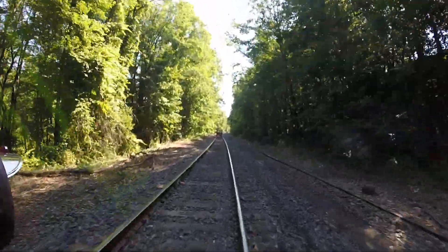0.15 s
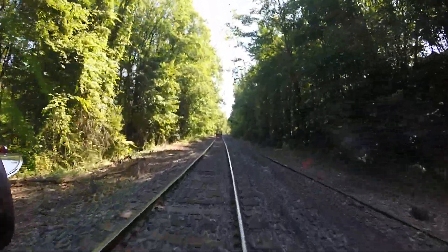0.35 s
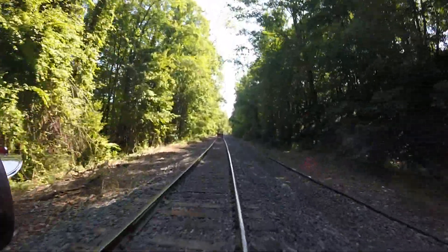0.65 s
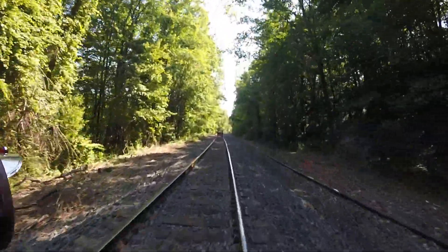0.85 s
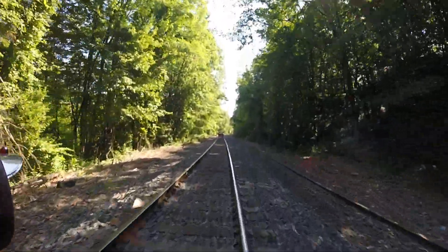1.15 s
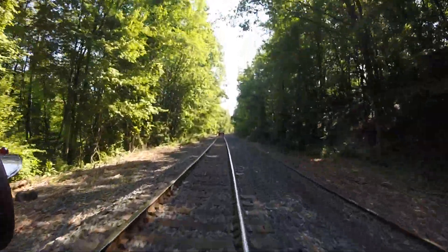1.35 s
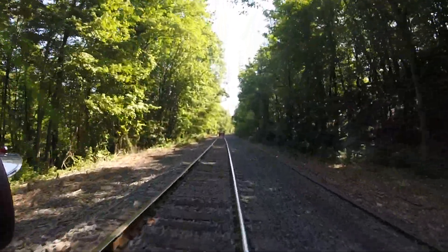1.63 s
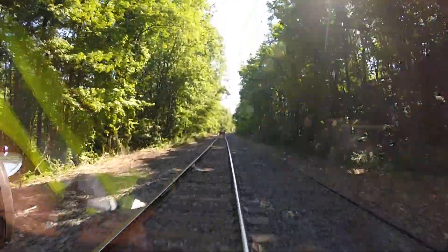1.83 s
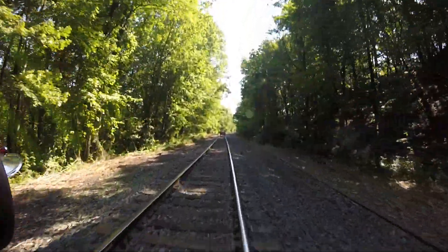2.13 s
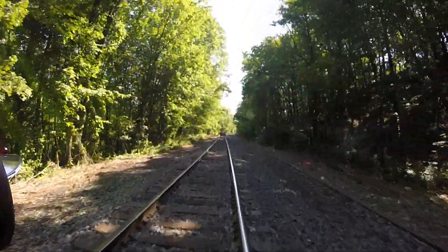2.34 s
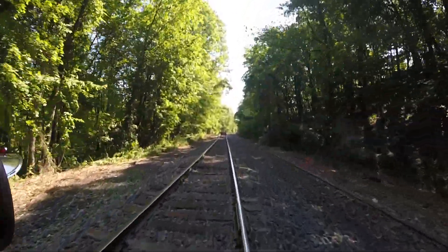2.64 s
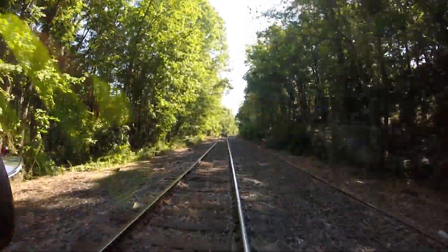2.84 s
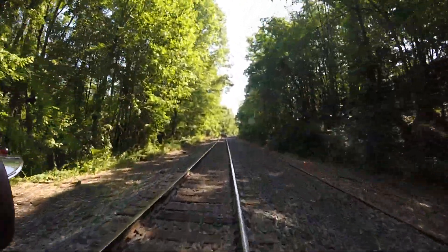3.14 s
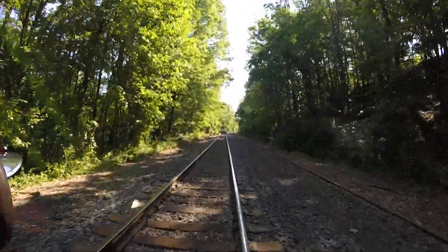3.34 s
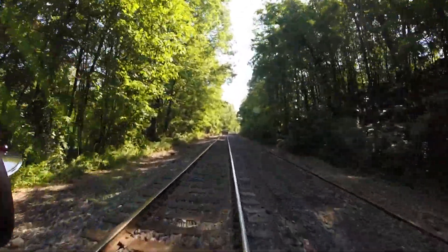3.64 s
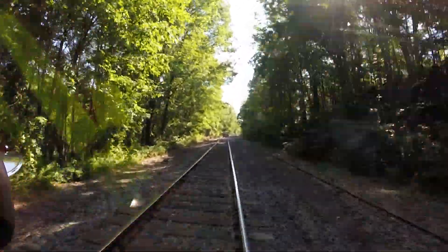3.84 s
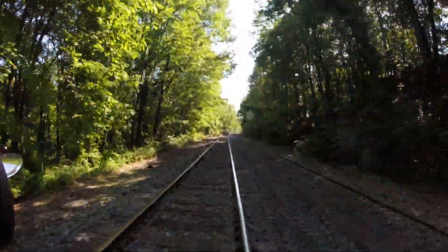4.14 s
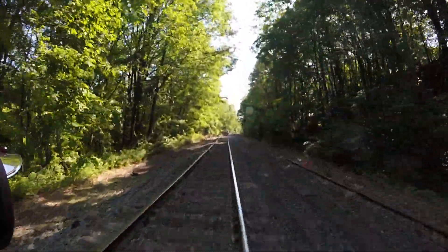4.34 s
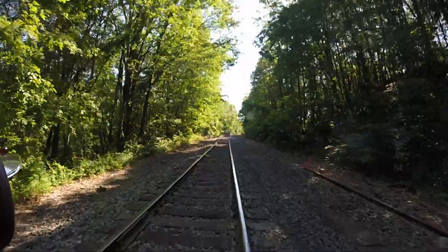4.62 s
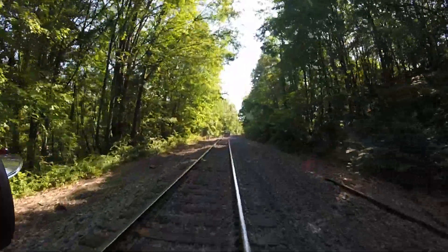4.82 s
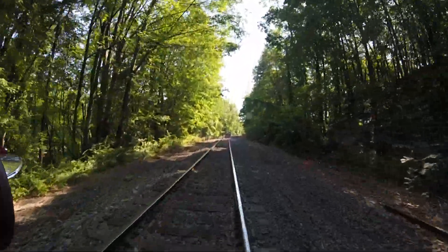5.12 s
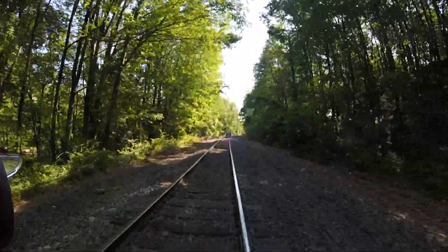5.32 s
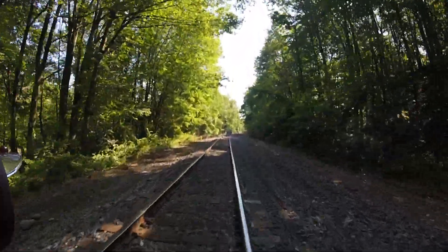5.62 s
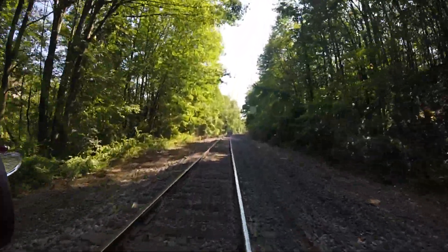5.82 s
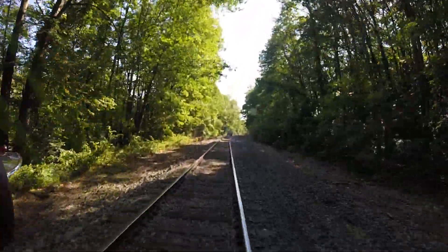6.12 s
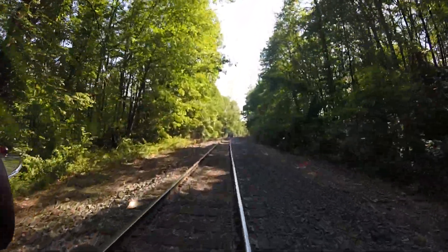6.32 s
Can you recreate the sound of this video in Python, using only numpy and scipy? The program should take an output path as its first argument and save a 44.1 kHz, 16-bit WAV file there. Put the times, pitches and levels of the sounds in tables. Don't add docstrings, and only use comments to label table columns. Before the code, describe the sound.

Riding a small motorised rail car: fast, even engine chugging, low wheel rumble, rattling frame and irregular knocks over rail joints, heard closely and muffled.

```python
import sys
import numpy as np
from scipy import signal
from scipy.io import wavfile
from scipy.ndimage import uniform_filter1d, minimum_filter1d

SR = 44100
rng = np.random.default_rng(int(sys.argv[2]) if len(sys.argv) > 2 else 0)


def waveform_to_disk(signal):
    frames = np.transpose(np.atleast_2d(signal))
    scaled = np.clip(frames, -1, 1) * 32767
    samples = np.round(scaled).astype(np.int16)
    wavfile.write(sys.argv[1], SR, samples)


def voltage_ratio(level):
    return 10 ** (np.asarray(level, float) / 20)


N = 285322


def amp_of(points, hz, column=1):
    table = np.array(points, float)
    return np.interp(np.log(hz), np.log(table[:, 0]), table[:, column])


def drift(rate):
    r = np.exp(-40 * np.pi * rate / SR)
    noise = rng.standard_normal(N // 20 + 2002)
    slow = signal.lfilter([1], [1, -2 * r, r * r], noise)[2000:]
    slow = slow - uniform_filter1d(slow, size=300)
    return np.interp(np.arange(N) / 20, np.arange(len(slow)), slow / slow.std())


def resonance(x, hz, width_hz):
    r = np.exp(-np.pi * width_hz / SR)
    top = np.array([1, 0, -1]) * (1 - r * r) / 2
    return signal.lfilter(top, [1, -2 * r * np.cos(2 * np.pi * hz / SR), r * r], x)


def cycles():
    at_start, firings_per_s, gain_per_s2 = .79125, 15.9797, .149484
    t = np.arange(N) / SR
    return at_start + firings_per_s * t + gain_per_s2 * t ** 2 / 2


def strokes(start, rise, fall, uneven):
    turn = cycles() - start + 1
    sizes = 1 + uneven * rng.standard_normal(int(turn[-1]) + 1)
    since = turn % 1
    return sizes[turn.astype(int)] * (1 - np.exp(-(since / rise) ** 2)) * np.exp(-since / fall)


def bursts(rows):
    rise_s = .0025
    u = np.arange(SR // 4) / SR
    out = np.zeros(N + SR)
    for s, db, length in rows:
        start = int(s * SR)
        out[start:start + len(u)] += voltage_ratio(db) * (1 - np.exp(-u / rise_s)) * np.exp(-(u / length) ** 2)
    return out[:N]


# (time [s], thud level [dB],
# rattle level [dB], length [s])
JOLTS = [(0.272, -12, -42, 0.01), (1.074, -14.5, -32, 0.062), (1.18, -12.5, -32, 0.027),
         (1.836, -17, -37, 0.09), (1.922, -24.5, -38, 0.03), (2.239, -10, -38, 0.0093),
         (3.077, -13.5, -36.5, 0.038), (3.168, -10.5, -33, 0.024), (3.472, -23, -34, 0.03),
         (3.701, -11.5, -30, 0.046), (3.805, -12, -28, 0.013), (3.969, -11.5, -45, 0.016),
         (4.347, -13, -30, 0.053), (4.439, -15.5, -32, 0.034), (4.462, -11, -31, 0.035),
         (5.137, -12.5, -30.5, 0.017), (5.306, -17.5, -37, 0.12), (5.627, -12, -34, 0.014),
         (5.645, -14.5, -34, 0.041), (5.743, -6.5, -28.5, 0.027), (6.07, -12.5, -28.5, 0.019),
         (6.078, -21, -38.5, 0.041), (6.269, -17, -35.5, 0.038), (6.373, -20, -33, 0.017),
         (0.026, -23, -37, .012), (0.637, -26, -32, .01), (1.81, -26, -35, .01), (2.004, -27, -34, .012),
         (2.06, -27, -35, 0.011), (2.363, -26.5, -34, 0.012), (2.612, -25, -37, 0.013),
         (2.974, -30, -35, .01), (3.382, -24, -32, 0.016), (3.583, -25, -38, 0.011),
         (3.815, -21, -35.5, 0.012), (4.247, -20.5, -37, .012), (4.313, -31, -35, 0.011),
         (4.554, -28, -41, 0.0082), (4.786, -24, -30.5, 0.012), (4.995, -15, -34, 0.026),
         (5.508, -25, -38, .01), (5.67, -19.5, -42, .01), (5.863, -26, -38, .01), (5.973, -27, -30, 0.013)]
# (time [s], level [dB], length [s])
JINGLES = [(1.0765, -44, .075), (1.836, -60, .067), (3.17, -37, 0.033), (3.702, -39, .063),
           (3.81, -51.5, .02), (4.361, -36, .025), (4.4455, -34, 0.029), (4.466, -33, 0.04),
           (5.312, -52.5, .064), (5.746, -44, 0.017), (5.885, -44, .074), (6.08, -35, 0.033)]


def jolts():
    rows = np.array(JOLTS)
    thud = voltage_ratio(11.0) * bursts(rows[:, [0, 1, 3]])
    rattle = voltage_ratio(32.0) * bursts(rows[:, [0, 2, 3]])
    jingle = voltage_ratio(42.0) * bursts(JINGLES)
    return thud, rattle, jingle


# (time [s], level [dB])
ROUGHNESS = [(0.0, -18.5), (0.41, -19.5), (0.77, -19), (1.17, -20), (1.49, -19.5), (1.84, -19), (2.83, -20),
             (3.12, -19.5), (3.549, -19), (4.38, -20), (4.74, -20.5), (5.46, -20.5), (5.62, -21),
             (5.8, -20.5), (6.2, -20), (6.47, -18.5)]
# (frequency [Hz], share [dB per dB])
FOLLOWS = [(250, 0.21), (600, 2.1), (2500, 0.76), (9000, 0.71)]
# (frequency [Hz], at the firing [dB], at the idle turn [dB])
SHAKE = [(40, -2, -3.5), (110, 5.5, 0.5), (250, 0, 5.5), (500, -2.5, 0), (755, 4.5, 2), (1190, 5.5, 1),
         (2000, 6.5, 5.5), (4560, 12.5, 2.5), (7500, 19.5, 9), (12000, 23.5, 12)]
# (frequency [Hz], lag [ms])
SHAKE_LAG = [(700, -4.5), (1500, -3.5), (3000, -1.5), (6000, 0), (10000, 1.5)]
# (frequency [Hz], level [dB per Hz])
COLOUR = [(22, -67.5), (45, -58.5), (65, -66.5), (110, -54.5), (160, -55), (200, -55.5), (280, -53.5),
          (380, -51), (520, -50.5), (700, -58.5), (1100, -72), (2100, -84.5), (2900, -92), (5000, -93.5),
          (6200, -104), (12500, -122)]


def rolling():
    shared_db, own_db, lumps_db, grain_db = 1.07, 0.5, 4, 1.0
    run_in = 8000
    s, db = np.transpose(ROUGHNESS)
    rough_db = np.interp(np.arange(N) / SR, s, db - np.mean(db))
    firing = strokes(0.068, 0.036, 0.13, uneven=0.072)
    idle = strokes(0.5, 0.058, 0.36, uneven=0.17)
    together = drift(10)
    knocks = jolts()
    white = rng.standard_normal((2, run_in + N))
    white[:, run_in:] *= voltage_ratio(grain_db * drift(140))
    edges = 20 * 2 ** np.arange(0, 9.7, 1 / 3)
    out = np.zeros(N)
    for k, (low, high) in enumerate(zip(edges, edges[1:])):
        hz = np.sqrt(low * high)
        band_pass = signal.butter(3, [low, high], "band", fs=SR, output="sos")
        band = signal.sosfilt(band_pass, white[k % 2])[run_in:]
        track_db = amp_of(FOLLOWS, hz) * rough_db * (hz > 150)
        lag = int(amp_of(SHAKE_LAG, hz) * SR / 1000)
        firing_db = amp_of(SHAKE, hz) * np.roll(firing, lag)
        idle_db = amp_of(SHAKE, hz, column=2) * idle
        flicker_db = shared_db * together + (own_db + lumps_db * (hz < 110)) * drift(0.5)
        steady = voltage_ratio(track_db + firing_db + idle_db + flicker_db - 8.5)
        knock = knocks[int(hz > 1000) + int(hz > 6300)] * (hz > 150)
        out += voltage_ratio(amp_of(COLOUR, hz) + 51.5) * band * np.hypot(steady, knock)
    return out


# (frequency [Hz], width [Hz], level [dB])
PANELS = [(516, 97, 3), (464, 67, 3), (285.8, 25, 5), (186, 31, 5), (362.4, 11, 4.5), (713, 26, 5),
          (853.2, 32, 9.5), (1207, 48, 2.5), (1632, 200, 5.5), (2100, 120, 5), (2300, 47, 4),
          (2780, 170, 5), (7400, 220, 2), (8880, 230, 5.5)]
# (frequency [Hz], width [Hz], level [dB])
GAP = [
    (3230, 300, -8),
    (3470, 100, 5.5),
]


def through_housing(x):
    for hz, width_hz, db in [*PANELS, *GAP]:
        x = x + (voltage_ratio(db) - 1) * resonance(x, hz, width_hz)
    return signal.sosfilt(signal.butter(8, 12800, fs=SR, output="sos"), x)


def damped_tones(rows, rise_cycles):
    u = np.arange(SR // 2) / SR
    out = np.zeros(N + SR)
    for s, db, hz, t60 in rows:
        start = int(s * SR)
        fade = voltage_ratio(db - 60 * u / t60) * (1 - np.exp(-u * hz / rise_cycles))
        out[start:start + len(u)] += np.sin(2 * np.pi * hz * u) * fade
    return out[:N]


# (time [s], peak level [dB], frequency [Hz], t60 [s])
HUMS = [(0.118, -12.5, 354, 0.25), (0.87, -25, 415, 0.15), (0.968, -26, 425, 0.17),
        (1.217, -13, 275.6, 0.19), (1.425, -11.5, 361, 0.15), (1.558, -13, 347, 0.11),
        (1.645, -9, 415, 0.14), (1.729, -9, 367, 0.18), (2.199, -9, 393, 0.15), (2.41, -12, 371, 0.16),
        (2.514, -14, 280, 0.17), (2.84, -18, 400, 0.13), (2.959, -10.5, 397, 0.13), (3.598, -17, 365, 0.1),
        (3.78, -24, 401, 0.13), (4.219, -11, 383, 0.18), (4.828, -17.5, 321, 0.092),
        (5.757, -5.5, 295, 0.11), (5.821, -10.5, 399, 0.1), (5.903, -10, 351, 0.077),
        (5.942, -14, 370, 0.2), (6.018, -12, 310, 0.18), (6.118, -17, 301, 0.13), (6.169, -12.5, 271, 0.18),
        (6.436, -4.5, 305, 0.15), (6.405, -10, 320, 0.11), (6.339, -16, 270, 0.11), (.05, -10.5, 200, 0.14),
        (.14, -11.5, 194, .15), (4.68, -12.5, 395, 0.16), (5.5, -13, 260, .14), (3.27, -13.5, 330, 0.15),
        (0.635, -12, 277.5, .14), (2.375, -17.5, 382, .12), (3.065, -12, 375, 0.21),
        (3.21, -11.5, 371, 0.14), (4.059, -10, 271.4, 0.14), (4.115, -13.5, 278, .12),
        (5.07, -17, 265, 0.11), (5.285, -18.5, 385, 0.15), (5.83, -11.5, 294, 0.16),
        (5.883, -7.5, 266, .14), (6.035, -6, 350, .1), (6.3, -8, 289, 0.14), (6.36, -14, 348, .12)]


def floor_hums():
    return damped_tones(HUMS, rise_cycles=4.0)


# (time [s], peak level [dB], frequency [Hz], t60 [s])
BOOMS = [(0.186, -5, 508, 0.074), (0.426, -13.5, 466, 0.16), (0.841, -9, 464, 0.24), (0.87, -1, 472, 0.087),
         (1.049, -6.5, 478, 0.16), (1.29, -10.5, 553, 0.1), (1.73, -9, 460, 0.076), (1.978, -4, 505, 0.24),
         (2.829, -5, 479, 0.1), (3.442, -10.5, 437, 0.13), (3.821, -7, 500, 0.077),
         (3.975, -12, 460, 0.076), (4.429, -3.5, 512, 0.11), (4.469, -11, 541, 0.09),
         (5.242, -5.5, 470, 0.078), (5.42, -16, 478, 0.078), (5.899, -2, 510, 0.075),
         (6.074, -10, 462, 0.12), (6.119, -17, 414, 0.074), (6.382, -1, 437, 0.091), (0.151, -7, 495, 0.14),
         (0.277, -13.5, 500, .1), (1.7, -13, 490, .1), (1.818, -15, 478, 0.092), (5.095, -6, 520, 0.13),
         (5.4, -10, 480, .1), (6.06, -14.5, 500, 0.091)]


def housing_booms():
    return damped_tones(BOOMS, rise_cycles=4.0)


# (time [s], frequency [Hz], peak level [dB], t60 [s])
RINGS = [(1.041, 186, -24, 0.15), (0.93, 3430, -47, .06), (1.93, 193, -14, 0.56), (3.172, 253.5, -13, 0.23),
         (3.81, 291, -6, 0.2), (3.991, 192, -6, 0.11), (1.85, 218, -12.5, 0.18), (3.382, 227, -12.5, 0.17),
         (4.33, 49, -22, 0.53), (4.801, 170, -14, 0.21), (5.4, 265.6, -19, 0.42), (5.87, 370, -15, 0.34),
         (4.363, 9050, -48, 0.022), (4.445, 7600, -53, 0.035), (4.471, 230, -21, 0.13),
         (4.485, 9000, -43, .02), (5.752, 425, -23, 0.091), (5.755, 790, -25, .08), (3.707, 2500, -37, .04),
         (1.09, 2030, -35, .1), (3.81, 1980, -31, 0.043), (3.652, 3620, -46, 0.036),
         (4.25, 4460, -43, 0.045), (5.747, 830, -10, 0.072), (5.748, 1300, -24, 0.056),
         (5.75, 580, -16, .06), (5.6, 1380, -35, .05), (6.08, 838, -17, 0.11), (6.272, 236, -9.5, 0.16),
         (6.381, 280, -18.5, 0.62), (4.2, 1620, -33, 0.11), (4.95, 1620, -36, .12), (4.5, 1750, -34, 0.055),
         (5.1, 1400, -31, .07), (4.765, 870, -21, 0.12), (5.31, 1250, -28, .06), (5.415, 1100, -27, .06),
         (2.82, 2000, -37, 0.087), (5.9, 1250, -32, .08), (2.1, 1620, -34.5, 0.073),
         (1.37, 1620, -34, 0.11), (3.2, 2200, -36, 0.088), (2.37, 860, -29, 0.06), (0.78, 630, -20, .08),
         (6.1, 2000, -34, .06)]


def struck_parts():
    return damped_tones([(s, db, hz, t60) for s, hz, db, t60 in RINGS], rise_cycles=2)


def buzz():
    start_s, gap_s, count = 3.853, .00335, 11
    hz, width_hz, level_db = 4000, 1500, -18
    at = ((start_s + gap_s * np.arange(count)) * SR).astype(int)
    ticks = np.full(N, 1e-18)
    ticks[at] = voltage_ratio(level_db + rng.normal(0, 1.5, count)) * np.hanning(count + 4)[2:-2]
    return resonance(resonance(ticks, hz, width_hz), hz, width_hz)


def crank():
    return voltage_ratio(-43) * np.sqrt(2) * np.sin(4 * np.pi * cycles())


# (time [s], delay [ms])
LATE = [(0, .4), (.35, .3), (.65, .03), (1.2, -.1), (1.8, -.22), (2.5, -.22), (3.1, .03), (3.65, .28),
        (3.95, -.42), (4.25, .05), (4.6, -.05), (4.95, .15), (5.5, -.03), (6.47, 0)]
# (time [s], thump change [dB], bark change [dB])
ODD_FIRINGS = [(.2, 3, -2), (.33, -2, 1), (.64, 2.5, -2.5), (.89, 0, 2.5), (1.26, 0, -3), (1.38, 1.5, -2.5),
               (1.57, -2, 1), (1.63, -0.5, -2.5), (3.22, 0.5, -3), (3.58, 1.5, 0), (3.7, 1.5, -3),
               (3.82, -5, -1.5), (3.88, -4, -4.5), (3.94, -1.5, 1), (4.01, -2, -1), (4.43, 1.5, -1),
               (4.49, -6, -1.5), (5.63, 1.5, -1), (6.04, -1.5, -0.5), (6.16, -3.5, 3), (6.22, -3.5, -4.5),
               (6.34, 0.5, -0.5), (6.4, -1, -6), (6.46, -2, -2), (1.94, 3.5, 3), (2.0, 2, 3),
               (2.06, 0.5, 1), (2.24, 0, 0.5), (2.49, -2, 0.5), (2.61, 2, 2.5), (3.28, 3, -2),
               (3.52, -1, -0.5), (4.13, 0, -0.5), (4.31, 1.5, 1), (4.37, 4.5, -3), (4.19, 0, 0.5),
               (.08, 0, -0.5), (1.44, 0.5, 0.5), (2.43, 0, -2), (6.28, 0.5, -1.5), (4.73, 2, -2),
               (5.5, 0.5, 1.5), (5.56, -5, 1), (5.74, 3.5, -16), (6.1, -1, -1), (.45, 0, 1), (4.91, 2, 0),
               (5.15, -1, 2)]
# (arrival [ms], polarity [+1 or -1])
ARRIVALS = [(2.13, -1), (.77, 1), (6.76, -1), (8.34, 1), (11.29, 1), (.76, -1), (1.45, -1), (15.87, 1),
            (6.3, 1), (28.6, -1), (6.31, -1), (5.49, -1), (2.02, -1), (6.0, -1)]
# (frequency [Hz], width [Hz], level [dB])
EXHAUST = [(101.2, 64, 36.4), (497.8, 44, 47.2), (496.9, 40, 42), (646, 367, 17.5), (100.4, 33, 30.3),
           (205, 52, 28.6), (723, 61, 24.3), (469, 101, 27.1), (3800, 1600, -3), (93, 29, 29.1),
           (862, 110, 21), (696, 99, 18.9), (1035, 102, 13.5), (1908, 463, 7)]


def exhaust():
    wheel_ms, firings_per_turn, first_peak = .21, 6.19, 5.3
    blow_hz, blow_lag_ms = 1000, .33
    scatter_ms, strength_db = (.08, .06), (.5, .3)
    fired = np.flatnonzero(np.diff(np.floor(cycles()))) / SR
    chance = rng.standard_normal((len(fired), 3))
    wheel_turns = (np.arange(len(fired)) - first_peak) / firings_per_turn
    load_ms = np.interp(fired, *np.transpose(LATE)) + wheel_ms * np.cos(2 * np.pi * wheel_turns)
    odd_db = np.zeros((len(fired), 2))
    for s, thump_db, bark_db in ODD_FIRINGS:
        odd_db[np.argmin(np.abs(fired - s))] = thump_db, bark_db
    out = np.zeros(N)
    for (ms, sign), (hz, width_hz, db) in zip(ARRIVALS, EXHAUST):
        part = int(hz > 300)
        late_ms = ms + load_ms - blow_lag_ms + scatter_ms[part] * chance[:, part]
        at = np.round((fired + late_ms / 1000) * SR).astype(int)
        inside = (at >= 0) & (at < N)
        blow_db = db + strength_db[part] * chance[inside, 2] + odd_db[inside, part]
        blows = np.full(N, 1e-18)
        blows[at[inside]] = sign * voltage_ratio(blow_db)
        out += resonance(resonance(blows, hz, width_hz), hz, width_hz)
    return signal.sosfilt(signal.butter(2, blow_hz, fs=SR, output="sos"), out)


def scene():
    running_gear = through_housing(rolling())
    ringing = floor_hums() + housing_booms() + struck_parts() + buzz()
    engine = crank() + exhaust()
    return (running_gear + ringing + engine)[None]


def low_pass(x):
    return signal.sosfilt(signal.butter(12, 15600, fs=SR, output="sos"), x)


def record(dry):
    gain = minimum_filter1d(np.minimum(1, .98 / np.abs(dry + 1e-9)), size=1201)
    for _ in range(4):
        gain = uniform_filter1d(gain, size=300)
    return low_pass(gain * dry)


dry = scene()
out = record(dry)
waveform_to_disk(out)
```